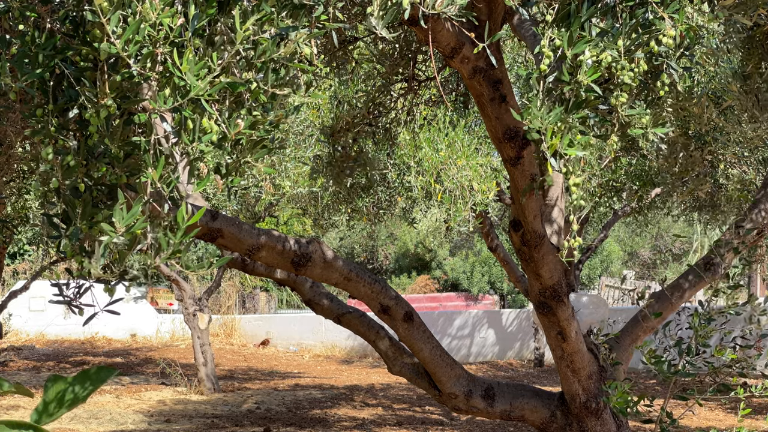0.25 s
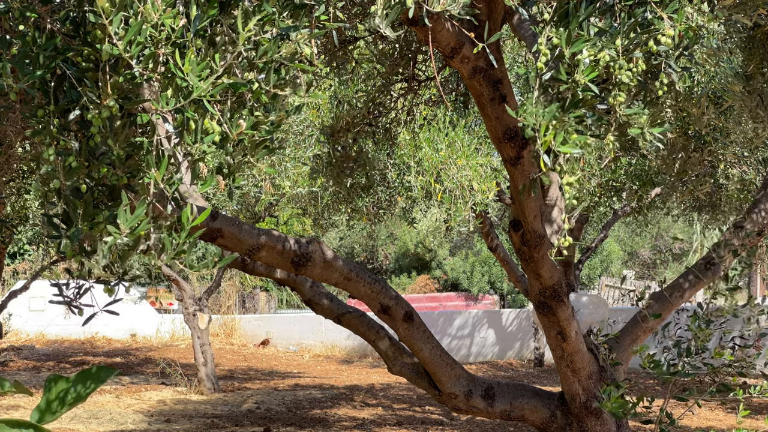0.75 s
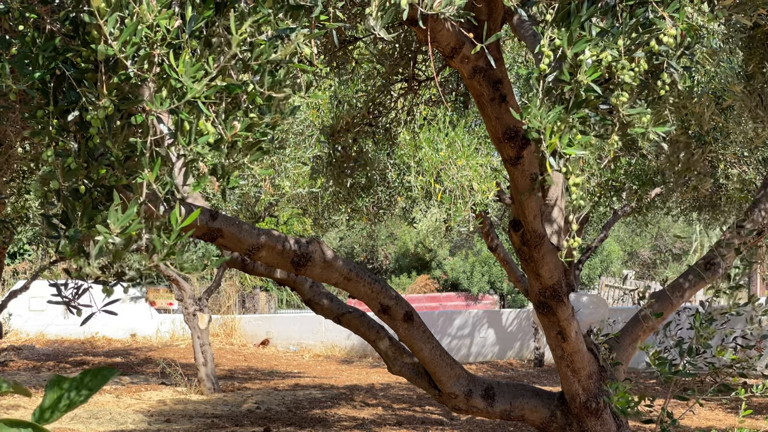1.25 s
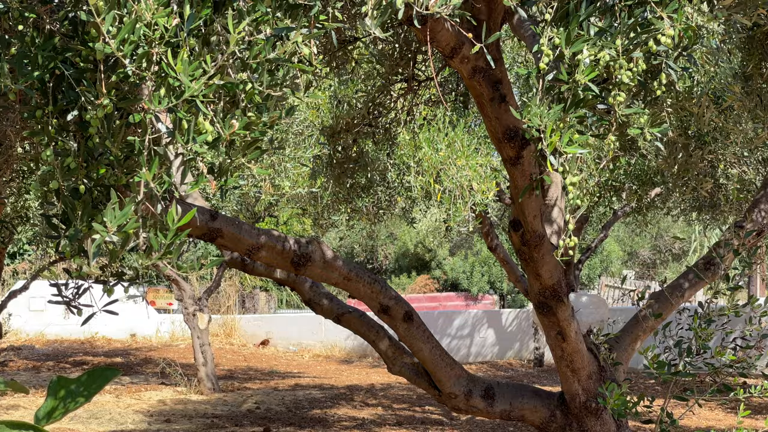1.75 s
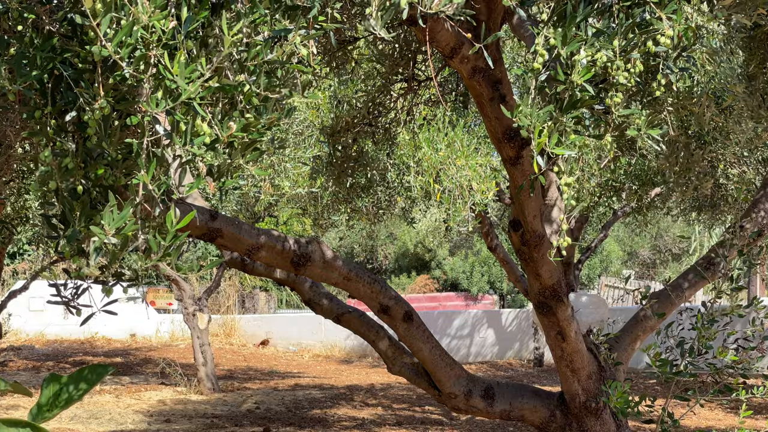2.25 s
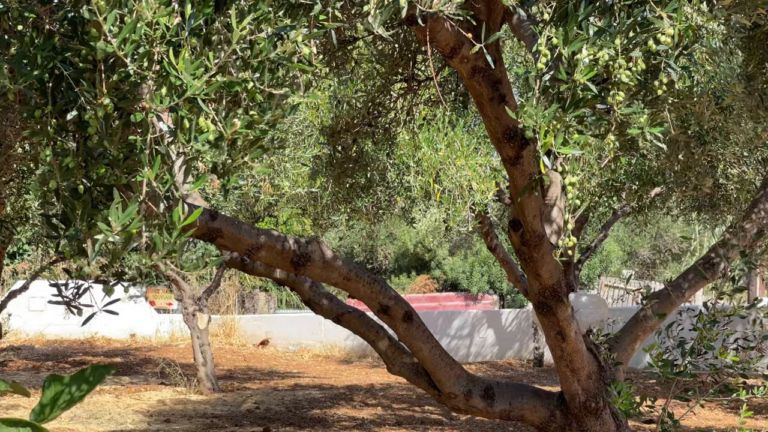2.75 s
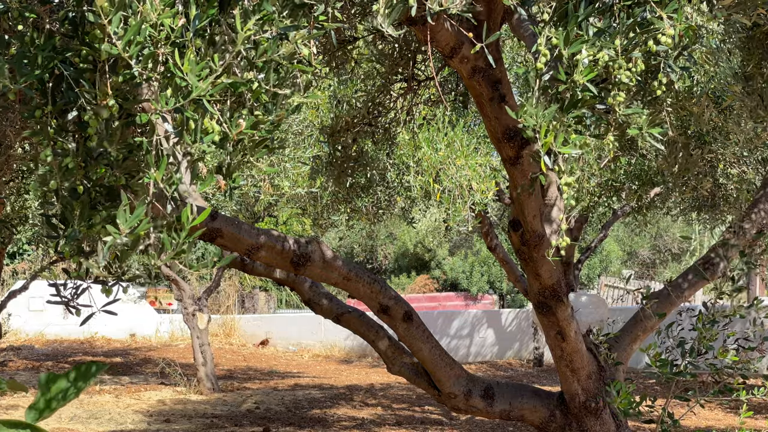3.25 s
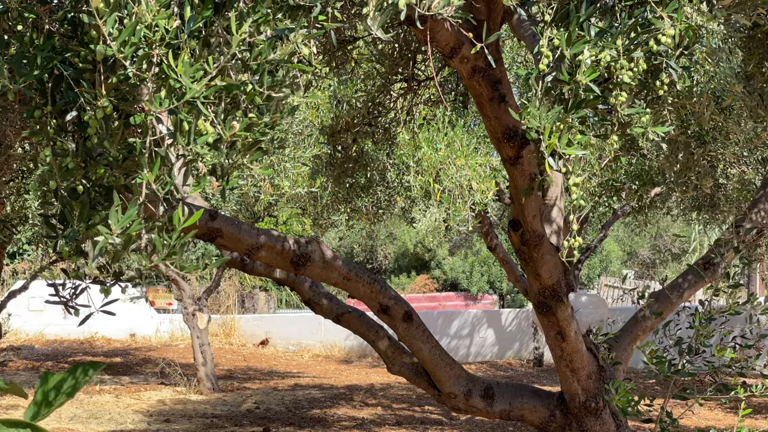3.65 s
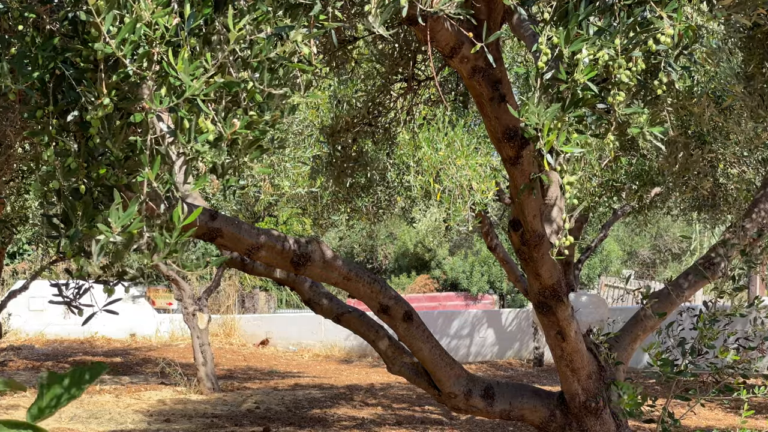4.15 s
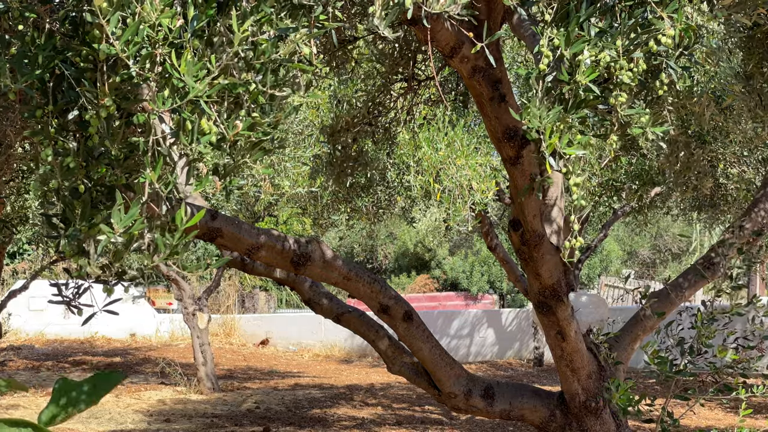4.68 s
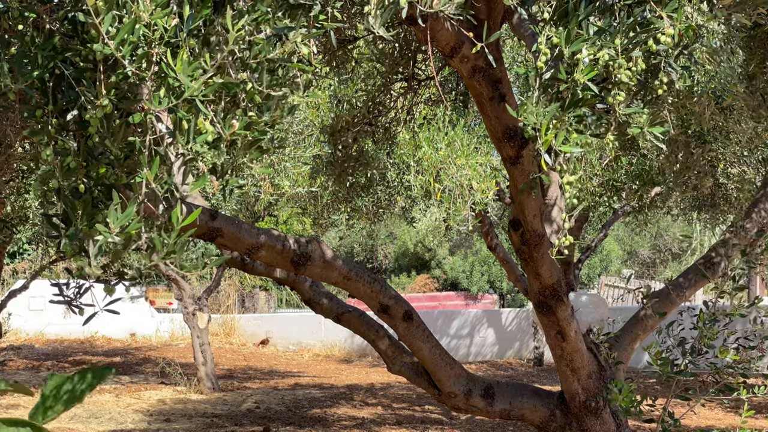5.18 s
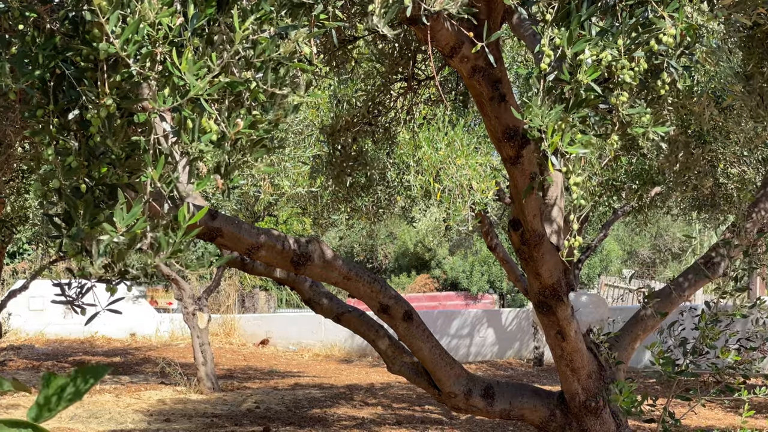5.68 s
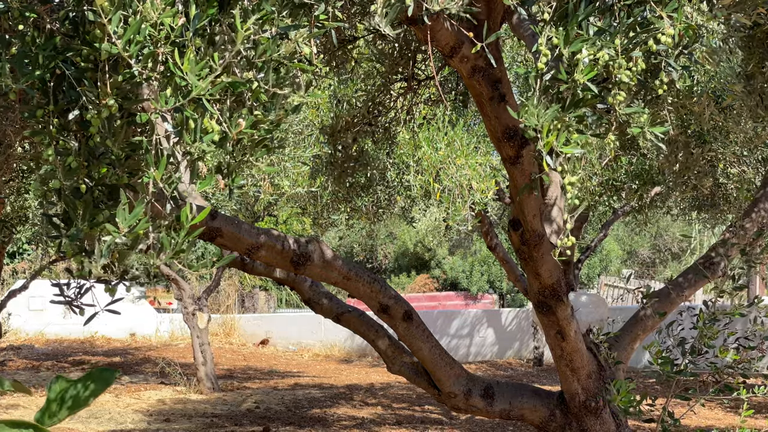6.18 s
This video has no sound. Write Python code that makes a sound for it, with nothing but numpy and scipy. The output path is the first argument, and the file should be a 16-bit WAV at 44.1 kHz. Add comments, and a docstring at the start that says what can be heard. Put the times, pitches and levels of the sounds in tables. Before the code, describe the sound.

Cicadas buzz loudly in a steady, rasping pulse over a distant chorus, with a faint low rumble underneath.

```python
"""Cicadas sing in an olive grove: the nearest chirp in step, under three times a second, over a far chorus.
Each chirp is a fast train of tymbal clicks ringing in the hollow body, scattered by trunks and leaves.
A far engine drones underneath, with a faint rumble of air and a few soft low bumps."""
import sys
import numpy as np
from scipy import signal
from scipy.fft import rfft, irfft, next_fast_len
from scipy.io import wavfile
from scipy.ndimage import map_coordinates

SR = 44100
rng = np.random.default_rng(int(sys.argv[2]) if len(sys.argv) > 2 else 0)


def store_wav(level_fs):
    """Save 16-bit WAV to argv[1]."""
    pcm = np.round(np.clip(np.atleast_2d(level_fs), -1, 1) * 32767)
    wavfile.write(sys.argv[1], SR, pcm.T.astype(np.int16))


N = 283122

# near pair's chirps: (start [s], length [s], softer overhang [s], level [dB], body ring [dB], sizzle [dB])
PAIR_CHIRPS = [(-0.096, 0.26, 0.11, -26, -5, 0.9), (0.157, 0.12, 0.09, -25.5, -0.2, -0.5),
               (0.289, 0.35, 0.02, -27.5, 0.5, 2), (0.637, 0.29, 0.025, -27.4, -0.3, 1.5),
               (0.95, 0.28, 0.075, -27.5, 0.5, 0), (1.325, 0.29, 0.098, -29, 4.2, 1.8),
               (1.728, 0.251, 0.057, -27.5, 0.8, -0.0), (2.104, 0.26, 0.023, -26.5, 0.3, -0.3),
               (2.44, 0.33, 0.022, -28.5, 0.8, -0.8), (2.86, 0.27, 0.043, -28.1, 1, -0.5),
               (3.266, 0.29, 0.00076, -28.3, 0.4, 0.5), (3.593, 0.28, 0.027, -29.9, 3, 0.0),
               (3.984, 0.28, 0.03, -27.5, 0.7, 0), (4.394, 0.25, 0.03, -28, 0.5, -0.4),
               (4.773, 0.26, 0.0, -28.3, 1.6, 0.5), (5.116, 0.284, 0.014, -30.5, -3.5, -1.5),
               (5.513, 0.27, 0.042, -28, 0, -0.3), (5.927, 0.3, 0.06, -27.5, 0.3, -0.5),
               (6.364, 0.27, 0.01, -30.5, 5.5, 4)]


def near_cicadas():
    """Two insects chirp in step: one rings in its hollow body, the other clicks faster."""
    # quiet buzz between chirps: (time [s], level [dB])
    lull = [(0, -38.5), (2.1, -35), (2.45, -43.1), (3.2, -36.5), (3.95, -39.5), (4.75, -34.0), (5.1, -34.5),
            (5.9, -37.5), (6.4, -38.5)]
    # tymbal rasp, body ring, rib clicks, top sizzle: (frequency [Hz], relative level [dB])
    rasp_spectrum = [(1600, -35), (2000, -20), (2300, -5.5), (2530, 0), (2780, 0.5), (2870, 0.5), (2990, 1),
                     (3130, -1), (3300, 2), (3550, -10), (4200, -19)]
    ring_spectrum = [(4100, -42), (4500, -27), (4870, -6.5), (4970, -9), (5130, -1), (5220, -1),
                     (5330, 1.5), (5450, -6), (5570, -3), (5720, -8.5), (6400, -22.5)]
    click_spectrum = [(5600, -3), (6250, 1.5), (6600, -3), (7000, -7.5), (7550, -1), (7830, 1), (7930, -4),
                      (8030, 1.5), (8470, -9), (8590, -1.5), (8800, -15), (9130, -13.5), (9600, -18)]
    sizzle_spectrum = [(9300, -5), (10300, -1), (11200, -1), (11900, -10), (12200, -10), (13100, -24)]
    lull_db, = curves(lull)
    level_db = 20 * np.log10(np.hypot(chirp_gain(PAIR_CHIRPS), amp(lull_db)))
    mid_chirp_tone = [(start + length / 2, *tone) for start, length, _, _, *tone in PAIR_CHIRPS]
    body_db, sizzle_db = curves(mid_chirp_tone)
    effort_db = level_db - level_db.mean()
    ring_db = level_db + body_db + 0.23 * effort_db - 4  # harder singing rings more
    ringing = buzz(start_hz=239.8, slowing_hz=22.954, leaves_db=-0.5)
    quick = buzz(start_hz=257.8, slowing_hz=18, leaves_db=4)
    both = ringing + quick
    rasp = amp(level_db - 12.5) * coloured(both, rasp_spectrum)
    ring = amp(ring_db) * coloured(ringing + amp(-8.5) * quick, ring_spectrum)
    click = amp(level_db - 3.5) * coloured(both, click_spectrum)
    sizzle = amp(level_db + sizzle_db - 12.5) * coloured(both, sizzle_spectrum)
    return rasp + ring + click + sizzle


def chirp_gain(chirps, swell_s=0.15, swell_db=19, grow_db_per_s=2.5, overhang_db=-3.5, fall_20db_s=0.043):
    """Each chirp swells, grows a little, drops a step for its overhang and stops short."""
    start_s, length_s, overhang_s, level_db = np.transpose(chirps)[:4, :, None]
    age_s = np.arange(N) / SR - start_s
    attack_db = -swell_db * np.maximum(1 - age_s / swell_s, 0) ** 2
    growth_db = grow_db_per_s * np.minimum(age_s - length_s, 0)
    stop_db = lambda after_s: -20 * np.maximum(age_s - after_s, 0) / fall_20db_s
    fall_db = np.maximum(stop_db(length_s), overhang_db + stop_db(length_s + overhang_s))
    flutter_db = 0.32 * wobble(16)  # unsteady effort
    return amp(np.max(level_db + attack_db + growth_db + fall_db, axis=0) + flutter_db)


def buzz(start_hz, slowing_hz, leaves_db, sweep_s=0.001603, sweep_hz=8000):
    """One insect's click train; its muscles slow from each chirp start of the near pair to the next."""
    starts_s = [row[0] for row in PAIR_CHIRPS]
    progress = np.interp(np.arange(N) / SR, starts_s, np.arange(len(starts_s))) % 1
    rate_hz = start_hz - slowing_hz * progress + 1.5 * wobble(12)
    clicks = tymbals(rate_hz, jitter_s=0.00008, scatter_db=0.4, weaker_db=-5.5)
    scattered = grove(clicks, leaves_db, leaves_t60_s=0.021, trunks_db=-6.5, trunks_t60_s=0.07)
    # a buckle runs across the ribs, so its pitches sound one after another
    return filtered(scattered, lambda hz: np.exp(-1j * np.pi * sweep_s * hz ** 2 / sweep_hz))


def tymbals(rate_hz, jitter_s, scatter_db, weaker_db):
    """Two tymbals buckle in turn, each at rate_hz, one more strongly than the other."""
    buckle_count = np.floor(2 * np.cumsum(rate_hz) / SR)
    buckles_s = np.flatnonzero(np.diff(buckle_count)) / SR
    time_spread, size_spread = rng.standard_normal((len(buckles_s), 2)).T
    size_db = weaker_db * (np.arange(len(buckles_s)) % 2) + scatter_db * size_spread
    at = np.round((buckles_s + jitter_s * time_spread) * SR).astype(int)
    return unit(np.bincount(np.clip(at, 0, N), amp(size_db), N + 1)[:N])


def grove(clicks, leaves_db, leaves_t60_s, trunks_db, trunks_t60_s):
    """Leaves smear each click and trunks echo it; the second row is an unrelated scatter."""
    t = np.arange(SR // 4) / SR
    energy = signal.fftconvolve(clicks ** 2, amp(-60 * t / leaves_t60_s) ** 2)[:N]
    leaves = unit(np.sqrt(np.abs(energy)) * noise())
    near = unit(clicks + amp(leaves_db) * leaves[0])
    trunk_response = rng.standard_normal(len(t)) * amp(-60 * t / trunks_t60_s)
    echoes = unit(signal.fftconvolve(near, trunk_response)[:N])
    return np.array([unit(near + amp(trunks_db) * echoes), leaves[1]])


def neighbour_cicada(murmur_db=-43):
    """A third insect with a lower body resonance chirps for a while, then only murmurs."""
    # its chirps: (start [s], length [s], softer overhang [s], level [dB])
    chirps = [(-.1, 0.23, 0.002, -27), (.15, 0.27, 0, -30), (.39, .27, 0, -27.5), (.68, .26, .01, -28.5),
              (.95, 0.23, 0.066, -29.5), (1.32, 0.28, 0.097, -37), (1.68, 0.265, .1, -30.5),
              (2.07, .29, 0.023, -29.5)]
    # its voice: (frequency [Hz], relative level [dB])
    spectrum = [(1900, -39), (2500, -16.5), (3100, -16.5), (3900, -41), (4500, -18), (4850, 0.5), (5100, 4),
                (5350, -4.5), (5580, -0.5), (6100, -23), (6900, -12), (7300, -4.5), (8400, -26),
                (9500, -36)]
    gain = np.hypot(chirp_gain(chirps), amp(murmur_db))
    clicks = buzz(start_hz=249.7, slowing_hz=24.02, leaves_db=5)
    return amp(-0.5) * gain * coloured(clicks, spectrum)


def far_cicadas():
    """Many distant singers blur into one restless hiss."""
    # chorus: (frequency [Hz], relative level [dB])
    spectrum = [(1500, -32), (2000, -13), (2450, 0.5), (3100, -7), (3850, -29), (4600, 4.5), (5300, -2),
                (6000, -6), (7400, 6.5), (9000, -16), (11200, -8), (13000, -32)]
    return amp(-40.5 + 1.3 * wobble(6)) * coloured(noise(), spectrum)


def far_engine():
    """Only the firing tone and a weak octave carry this far."""
    # drone: (time [s], firing rate [Hz], level [dB])
    drone = [(0.0, 72.5, -47), (0.09, 70.1, -40), (0.43, 66.0, -39), (0.52, 62.6, -53), (0.59, 60.2, -41),
             (0.73, 54.9, -56), (0.82, 56.8, -50), (0.89, 55.1, -34), (1.03, 54.5, -41), (1.2, 54, -32),
             (1.29, 53.86, -40.5), (1.38, 54.6, -33.5), (1.59, 55.4, -51), (1.97, 57.5, -37),
             (2.63, 59.7, -41), (2.73, 59.56, -28), (3.68, 60.54, -44), (3.88, 59, -40.5), (3.95, 59, -48),
             (4.15, 57.9, -37), (4.36, 57.7, -55.5), (4.76, 58.4, -38), (5.24, 57.4, -38),
             (5.31, 58.0, -32.5), (5.9, 56.9, -38.5), (6.42, 56.1, -38.5)]
    firing_hz, level_db = curves(drone)
    phase = 2 * np.pi * np.cumsum(firing_hz + 0.15 * wobble(14)) / SR
    firing = amp(level_db - 0.2) * np.sin(phase)
    octave = amp(-61.5 + 3.1 * wobble(5)) * np.sin(2 * phase)
    return np.sqrt(2) * (firing + octave)


def bumps(ring_hz=72.66, t60_s=0.1, attack_s=0.0018):
    """Each bump is a low push that dies within a few cycles."""
    # soft bumps: (time [s], level [dB])
    hits = [(2.728, -21), (2.778, -26), (2.793, -24), (2.829, -20), (2.843, -25), (3.5, -33), (5.245, -32),
            (5.285, -33)]
    start_s, level_db = np.transpose(hits)
    age_s = np.maximum(np.arange(N) / SR - start_s[:, None], 0)
    envelope = amp(-60 * age_s / t60_s) * (1 - np.exp(-age_s / attack_s))
    return amp(level_db) @ (envelope * np.sin(2 * np.pi * ring_hz * age_s))


def air():
    """Light wind and far traffic: a faint wash over a rumble."""
    # wash, rumble: (frequency [Hz], relative level [dB])
    wash_spectrum = [(80, -1), (115, -0.5), (150, -7), (205, -8), (310, -18), (600, -20.5), (900, -23.5),
                     (1300, -28), (1800, -34)]
    rumble_spectrum = [(20, -29), (30, -14), (48, 0), (60, 5), (80, -0.5), (100, -10), (160, -33)]
    wash = amp(-48.5 + 0.28 * wobble(4.06)) * coloured(noise(), wash_spectrum)
    rumble = amp(-48 + 1.7 * wobble(1.702)) * coloured(noise(), rumble_spectrum)
    return wash + rumble


def stereo(pair):
    """Left and right get a shared and an unshared part, shifted in phase."""
    # left-right likeness: (frequency [Hz], coherence [0..1])
    coherence = [(60, 0.82), (250, 0.89), (500, 0.44), (1000, 0.55), (1500, 0.062), (1850, 1), (3200, 0.98),
                 (3600, 0.83), (4400, 0.85), (5100, 1), (8600, 0.95), (9300, 1), (12200, 1), (13000, 0.1)]
    # left ahead of right: (frequency [Hz], phase [rad])
    lead = [(400, 0), (900, 1.6), (1300, 1.4), (1800, 0), (3200, .65), (4000, .1), (4700, .6), (5500, .45),
            (6200, 0), (7500, 0), (7850, .55), (8850, 0), (9200, -1.4), (10250, -np.pi), (11200, -4.9),
            (11800, -2 * np.pi)]
    mix_rad = lambda hz: np.arccos(np.clip(along(coherence, hz), -1, 1)) / 2
    mid, side = filtered(pair, lambda hz: np.array([np.cos(mix_rad(hz)), np.sin(mix_rad(hz))]))
    left_right = np.array([mid + side, mid - side])
    return filtered(left_right, lambda hz: np.exp(0.5j * along(lead, hz) * np.array([[1], [-1]])))


def amp(db):
    return 10 ** (np.asarray(db) / 20)


def unit(x):
    return x / np.sqrt(np.mean(x ** 2) + 1e-20)


def along(points, hz):
    """Interpolate (frequency [Hz], value) points on a log axis."""
    knots_hz, values = np.transpose(points)
    return np.interp(np.log(hz + 1), np.log(knots_hz + 1), values)


def curves(rows):
    """One value per sample for each column after the time."""
    times_s, *columns = np.transpose(rows)
    return [np.interp(np.arange(N) / SR, times_s, column) for column in columns]


def wobble(knots_per_s):
    """Smooth random curve."""
    knots = rng.standard_normal(int(N * knots_per_s / SR) + 4)
    return map_coordinates(knots, [np.arange(N) * knots_per_s / SR])


def noise():
    """Two unrelated white noises."""
    return rng.standard_normal((2, N))


def filtered(x, response):
    """Apply a complex frequency response."""
    size = next_fast_len(N + SR // 2)
    return irfft(rfft(x, size) * response(np.fft.rfftfreq(size, 1 / SR)), size)[..., :N]


def coloured(x, spectrum):
    """Shape x by a spectrum with steep skirts; rms 1."""
    low_hz, high_hz = spectrum[0][0], spectrum[-1][0]
    skirts = lambda hz: 1 / np.sqrt((1 + (low_hz / (hz + 1)) ** 16) * (1 + (hz / high_hz) ** 16))
    return unit(filtered(x, lambda hz: amp(along(spectrum, hz)) * skirts(hz)))


def scene():
    cicadas = near_cicadas() + neighbour_cicada() + far_cicadas()
    return stereo(cicadas + air()) + far_engine() + bumps()


def record(dry, bass_hz=32, top_hz=13150):
    """The deepest bass rolls off; nothing passes above top_hz."""
    return filtered(dry, lambda hz: (hz < top_hz) / np.sqrt(1 + (bass_hz / (hz + 1)) ** 4))


dry = scene()
out = record(dry)
store_wav(out)
```